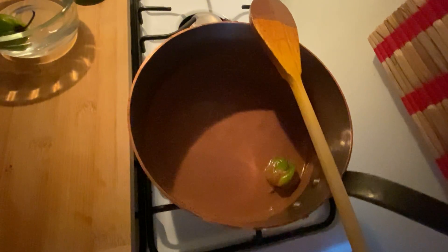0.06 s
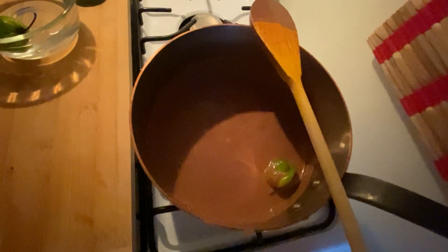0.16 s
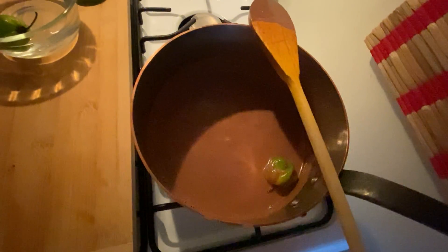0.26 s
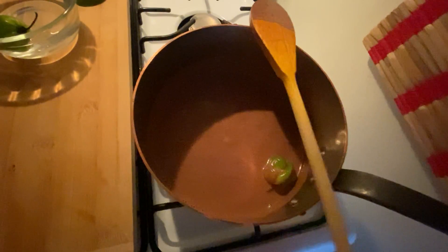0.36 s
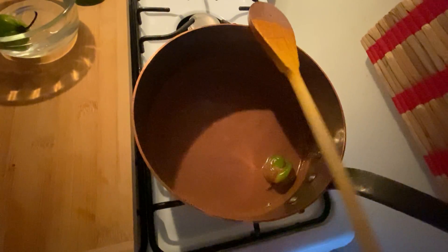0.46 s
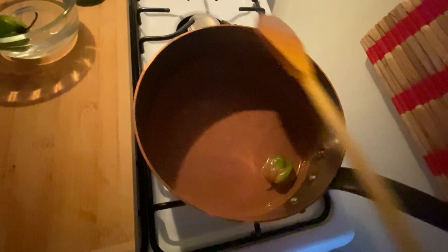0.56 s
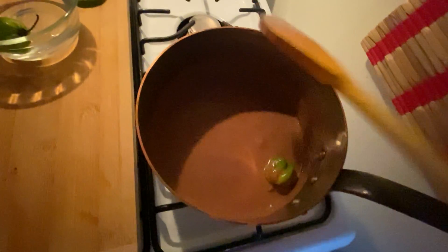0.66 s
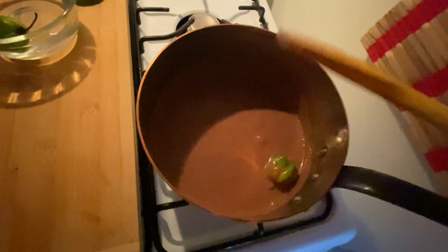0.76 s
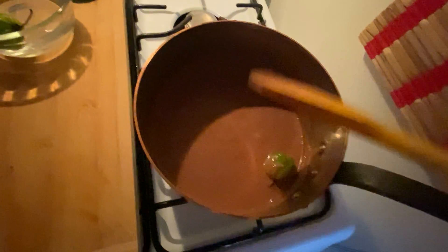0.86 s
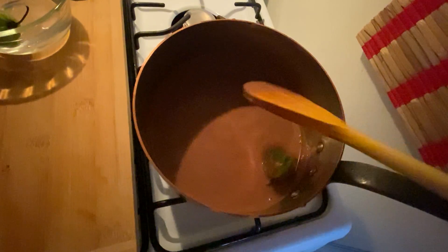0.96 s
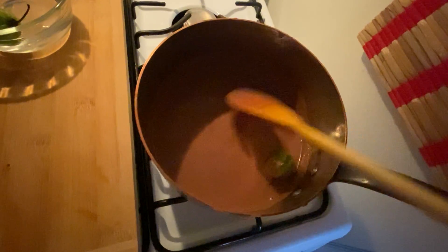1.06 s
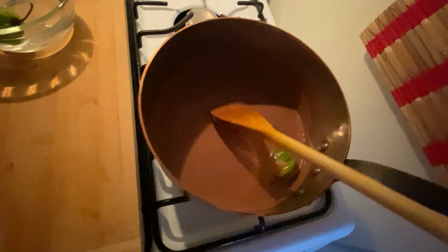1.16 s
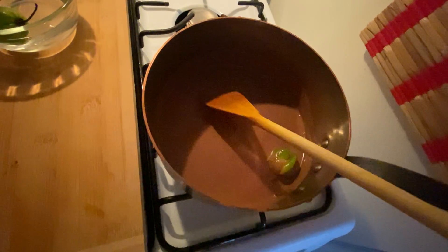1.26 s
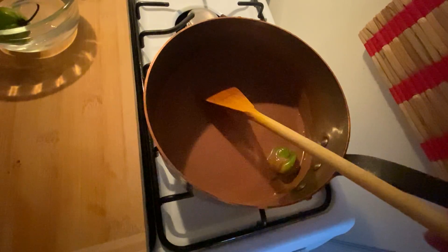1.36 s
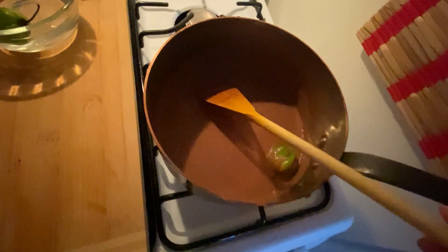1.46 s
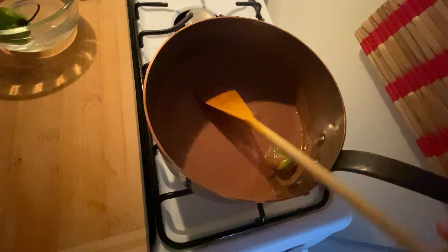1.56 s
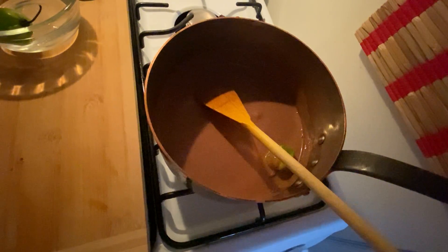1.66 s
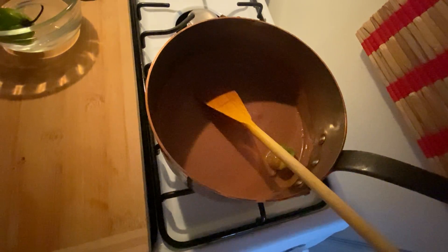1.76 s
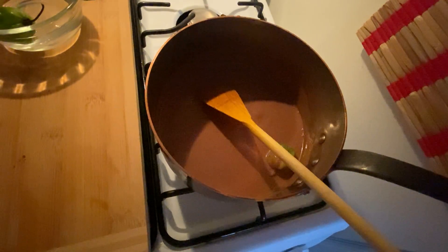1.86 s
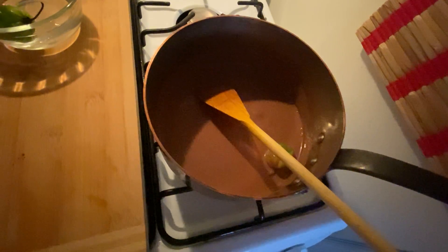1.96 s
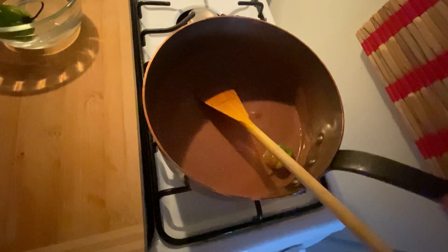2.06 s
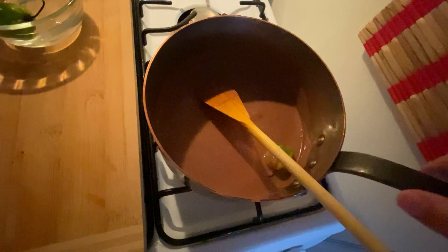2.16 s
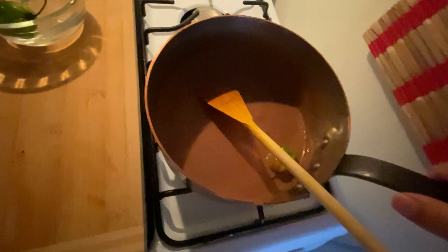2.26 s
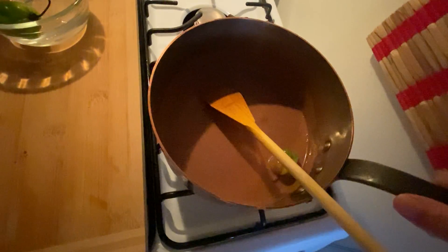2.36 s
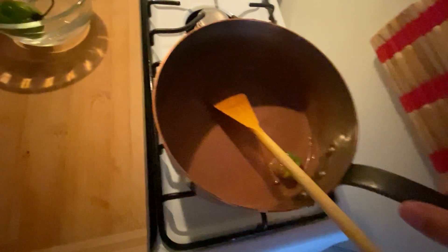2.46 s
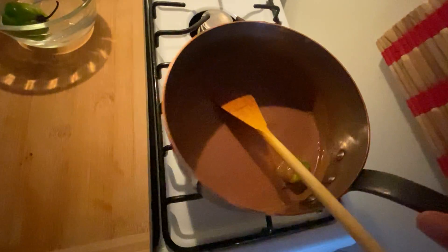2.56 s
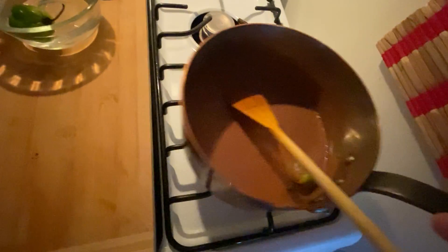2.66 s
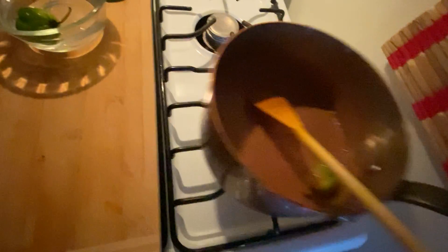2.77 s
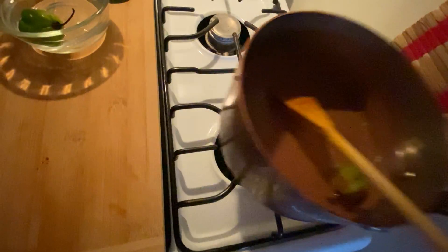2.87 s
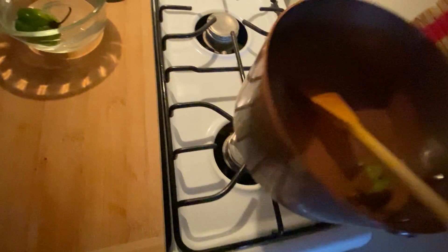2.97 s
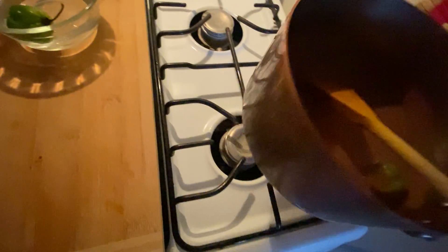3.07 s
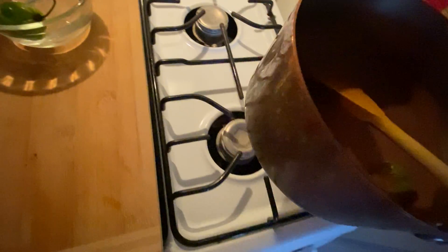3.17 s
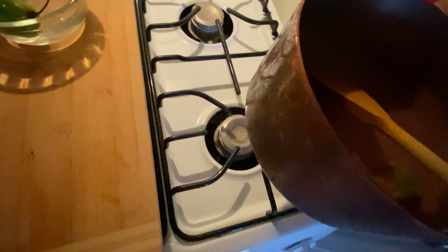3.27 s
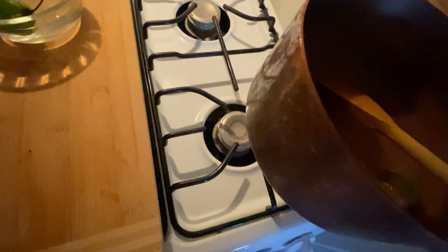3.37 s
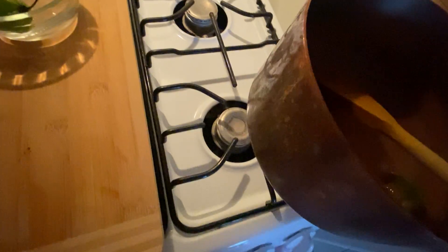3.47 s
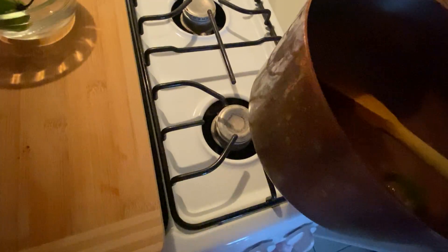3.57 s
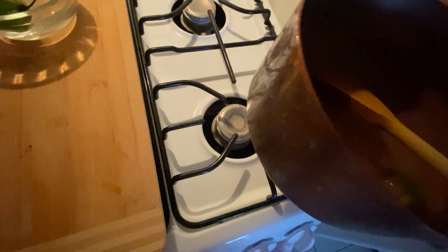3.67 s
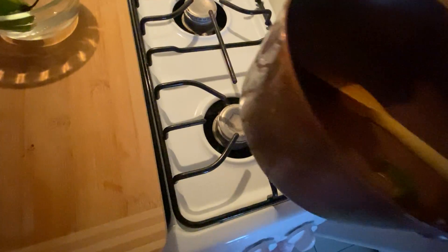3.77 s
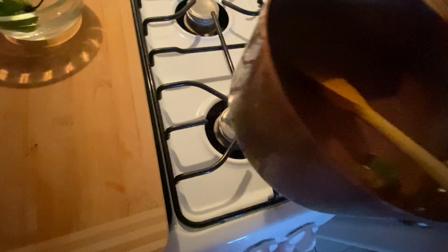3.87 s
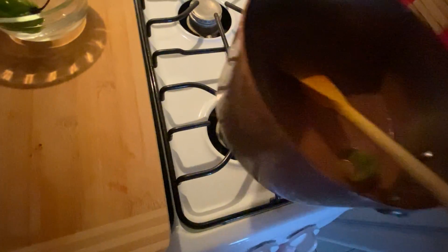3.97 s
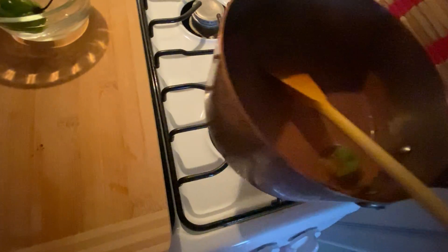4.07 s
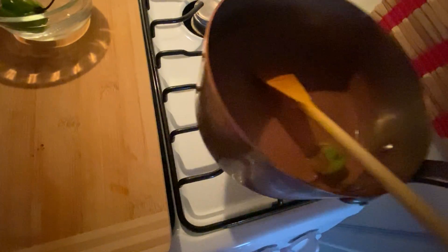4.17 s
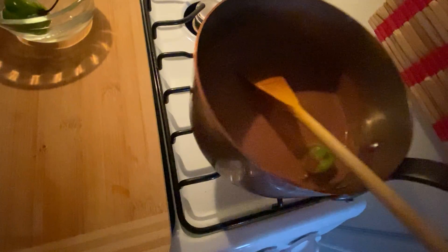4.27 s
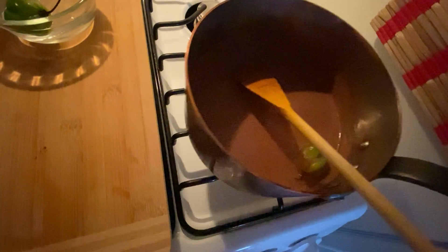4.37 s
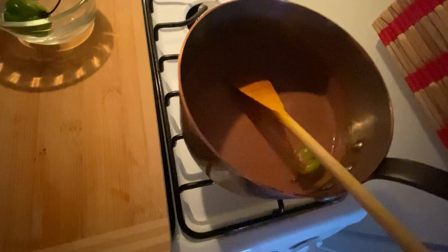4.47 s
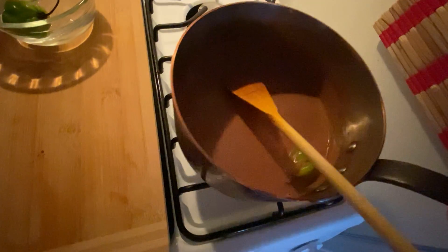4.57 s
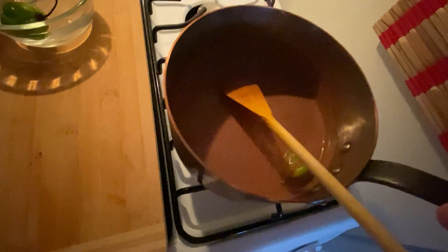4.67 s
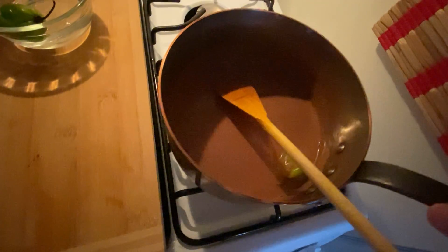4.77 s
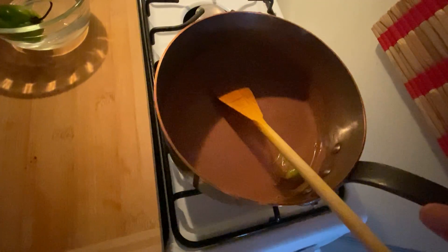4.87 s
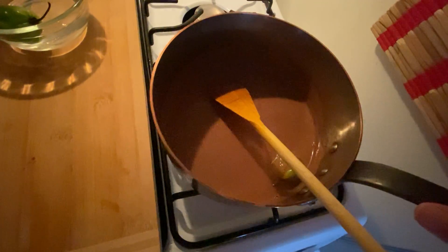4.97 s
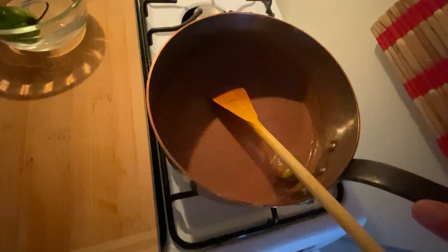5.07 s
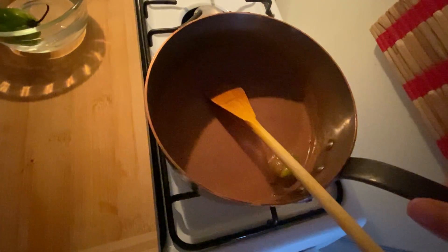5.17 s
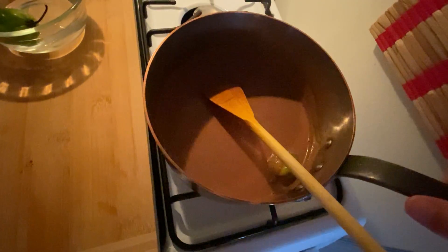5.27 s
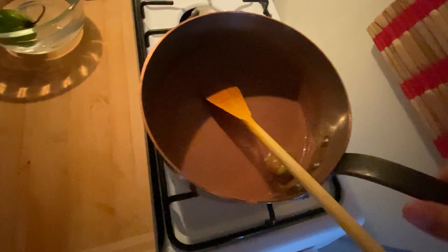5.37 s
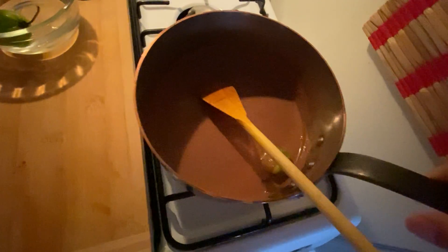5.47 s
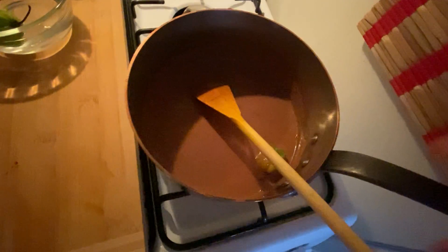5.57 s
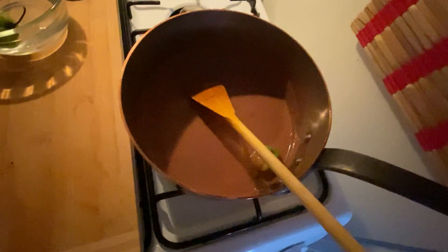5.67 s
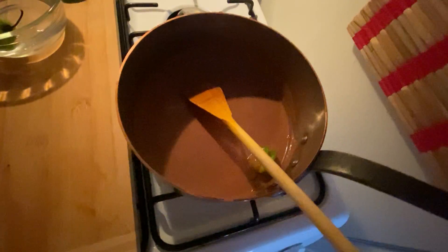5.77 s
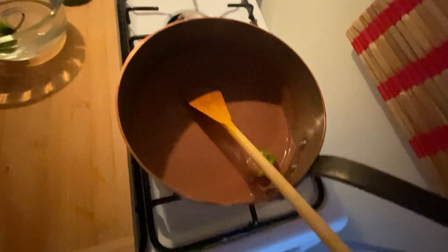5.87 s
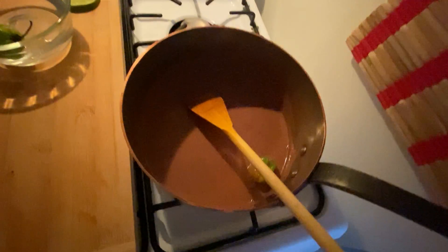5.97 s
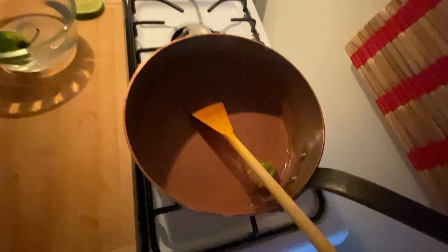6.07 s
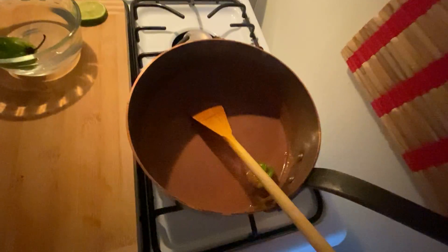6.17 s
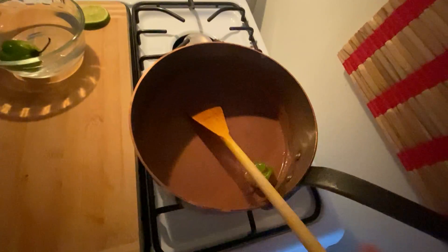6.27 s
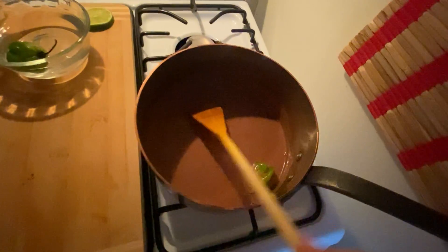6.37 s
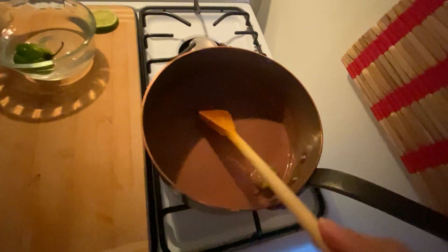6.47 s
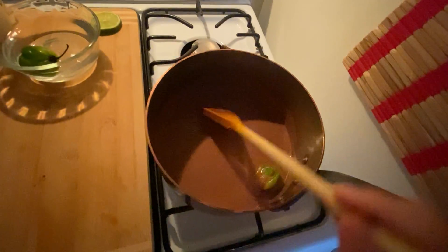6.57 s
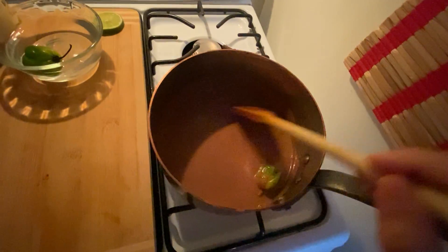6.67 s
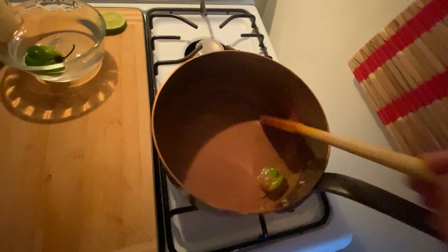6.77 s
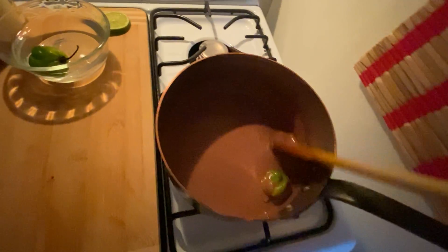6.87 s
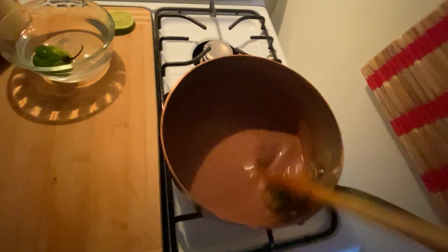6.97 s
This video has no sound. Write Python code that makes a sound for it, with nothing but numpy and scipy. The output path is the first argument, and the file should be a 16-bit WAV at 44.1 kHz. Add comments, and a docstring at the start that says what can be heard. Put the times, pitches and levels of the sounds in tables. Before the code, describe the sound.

Over steady fan hum and faint fridge buzz, a spoon taps a metal pan, the pan lifts with small clanks, then lands in a loud rattle.

```python
"""Copper pan and wooden spoon on a gas hob

Close by in a small, hard-walled kitchen, a wooden spoon is laid into a copper saucepan. The pan is dragged
off the iron grate, tilted and set down with a clatter; then the spoon is picked up and rings the pan's wall.
Blows drive decaying modes and short noise bursts; rubs are shaped noise. A fan hums as shaft tones and air,
and a fridge compressor buzzes as one repeated rattle through a resonant shell, over a faint hiss."""
import sys
import numpy as np
from scipy import signal
from scipy.fft import rfft, irfft, next_fast_len
from scipy.io import wavfile
from scipy.ndimage import uniform_filter1d, map_coordinates

SR = 44100
rng = np.random.default_rng(int(sys.argv[2]) if len(sys.argv) > 2 else 0)


def transcribe(signal):
    """Save signal, clipped to [-1, 1], as a 16-bit WAV file at the path in sys.argv[1]."""
    frames = np.atleast_2d(signal).T
    limited = np.clip(frames, -1, 1)
    pcm = np.round(limited * 32767).astype(np.int16)
    wavfile.write(sys.argv[1], SR, pcm)


N = 309582  # length in samples

# the spoon meets the pan: start_s, level_db, lower_knock_hz, upper_knock_hz, upper_knock_db,
# bottom_ring_db, wood_click_db, handle_ring_db, wall_ring_db
SPOON_TAPS = [(1.024, -68, 1350, 1900, -3, 6, -14, -18, -8),
              (1.198, -31.3, 730, 1250, -10, -4.5, -28, -36, -30),
              (1.511, -66, 1100, 1900, -4, 0, -15, -20, -20), (1.66, -46, 790, 1400, -13, -9, -.5, -21, -9),
              (6.8118, -39.5, 980, 1520, 1, -8.5, -18, -15, -24)]


def amp(db):
    """Decibels to gain."""
    return 10 ** (np.asarray(db) / 20)


def unit(x):
    """Scale to rms 1."""
    return x / np.sqrt(np.mean(x ** 2) + 1e-20)


def unit_onset(x):
    """Scale so that the first 20 ms have rms 1."""
    return x / np.sqrt(np.mean(x[..., :SR // 50] ** 2) + 1e-20)


def along(points, hz):
    """Interpolate (Hz, value) points on a log frequency axis."""
    f, v = np.transpose(points)
    return np.interp(np.log(hz + 1), np.log(f + 1), v)


def wobble(rate):
    """A smooth random curve, rate knots a second."""
    knots = rng.standard_normal(int(N * rate / SR) + 4)
    return map_coordinates(knots, [np.arange(N) * rate / SR])


def filtered(x, response):
    """x shaped by a response of frequency, with padding so that tails do not wrap round."""
    n = x.shape[-1]
    m = next_fast_len(n + SR // 4)
    return irfft(rfft(x, m) * response(np.fft.rfftfreq(m, 1 / SR)), m)[..., :n]


def causal(gain):
    """The minimum-phase response with this gain: nothing sounds before the blow."""
    cepstrum = irfft(np.log(np.maximum(gain, 1e-6)))
    half = len(cepstrum) // 2
    cepstrum[1:half] *= 2
    cepstrum[half + 1:] = 0
    return np.exp(rfft(cepstrum))


def resonances(peaks, f):
    """Response of (Hz, width Hz, dB) resonances, summed with alternating signs."""
    total = 0
    for k, (hz, width, db) in enumerate(peaks):
        total = total + (-1) ** k * amp(db) * 1j * f * width / (hz * hz - f * f + 1j * f * width)
    return total


def add(track, s, sound):
    """Mix a sound in at time s."""
    part = track[:, round(s * SR):][:, :sound.shape[-1]]
    part += sound[..., :part.shape[-1]]


def ring(modes, t, scatter_db, spread=2):
    """Decaying modes; strength and phase (spread in radians) differ at the two microphones."""
    hz, db, t60 = np.transpose(modes)[:, :, None, None]
    size = amp(db + scatter_db * rng.standard_normal((len(modes), 2, 1)))
    phase = rng.uniform(0, 2 * np.pi, hz.shape) + spread * rng.standard_normal(size.shape)
    decaying = size * amp(-60 * t / t60) * np.sin(2 * np.pi * hz * t + phase)
    return unit_onset(decaying.sum(0))


def burst(spectrum, t, t60):
    """Countless short-lived modes: coloured noise that dies away."""
    noise = rng.standard_normal((2, len(t))) * amp(-60 * t / t60)
    return unit_onset(filtered(noise, lambda f: causal(amp(along(spectrum, f)))))


def brighten(x, tilt_db):
    """A harder contact tilts the sound towards the treble."""
    return unit_onset(filtered(x, lambda f: causal(amp(tilt_db * np.log2(1 + f / 1000)))))


def stroke(s, length, attack, release):
    """An envelope that rises up to time s, holds for a length, then dies away."""
    t = np.arange(N) / SR - s
    return np.exp(-(np.minimum(t, 0) / attack) ** 2 - np.maximum(t - length, 0) / release)


def in_kitchen(x, wet_db):
    """The sound plus a diffuse tail from the near walls; its treble dies sooner."""
    # the kitchen's decay: pitch_hz, t60_s
    room_decay = [(150, 0.97), (1000, 0.45), (4000, 0.27), (8000, 0.22), (14000, 0.086)]
    hz, t, z = signal.stft(rng.standard_normal((2, SR // 2)), SR, nperseg=256)
    fading = z * amp(-60 * t / along(room_decay, hz)[:, None])
    tail = signal.istft(fading, SR, nperseg=256)[1]
    tail *= 1 - np.exp(-np.arange(tail.shape[1]) / SR / 0.0012)  # the walls answer a little late
    tail /= np.linalg.norm(tail[0])
    return x + amp(wet_db) * signal.fftconvolve(x, tail, axes=1)[:, :x.shape[1]]


def contacts(count):
    """Each clank and its rebound as the pan rocks back, weaker and duller."""
    # pan meets grate: start_s, level_db, brightness_db_per_octave, spot_hz, spot_boost_db, ringing_mode_hz
    clanks = [(2.363, -56, -7, 1430, -11, 1216), (2.485, -42, -3.5, 900, -8, 3467),
              (2.497, -46.5, -4.5, 4400, -5, 3467), (2.578, -47, -9, 1300, 3, 1216),
              (2.586, -45.5, -11, 900, -1, 1034), (2.615, -40.5, -3.5, 1900, 6, 1930),
              (2.621, -34.5, -7.5, 1300, 10, 1216), (2.627, -42.5, -8, 1800, 12, 1930),
              (2.65, -44.5, -3, 1250, 17, 1216), (2.658, -54, -3, 1500, 11, 1470),
              (2.705, -52, -20, 1480, -4, 1930), (2.847, -54.5, -12, 1290, -9, 1216),
              (2.915, -54.5, -12, 1380, -7, 1216), (4.994, -32, -6, 900, 2, 806),
              (5.003, -27, 0, 1520, -3, 3079), (5.012, -37, -1, 6500, 12, 1930),
              (5.021, -35, -5.5, 1300, -1, 1216), (5.089, -31.5, -3, 2630, -3, 2742),
              (5.102, -39, -3, 1300, 2, 1400), (5.125, -29, -3, 1500, 3, 1034),
              (5.137, -23.5, 3.5, 3800, 0, 4080), (5.146, -24, -2, 1910, 0, 1400),
              (5.171, -34.5, -7, 1120, 8, 806), (5.178, -41, -8, 1700, -2, 1530),
              (5.212, -46, -5.5, 3450, 11, 3467), (5.415, -60, -2, 1500, 13, 1390),
              (5.468, -49, -4.5, 1300, -16, 1216), (5.505, -42, -8, 1090, -6, 1130)]
    delay_s, loss_db, dull_db_per_octave = .029, 18.5, 8
    return [(s + k * delay_s, db - k * loss_db, tilt_db - k * dull_db_per_octave, *spot)
            for s, db, tilt_db, *spot in clanks for k in range(count)]


def pan_on_grate():
    """A blow and a rattle of smaller ones, coloured by the spot struck; modes near a set pitch ring most."""
    # modes of pan and grate together: pitch_hz, level_db
    pan_modes = [(441, -1), (628, -14), (806, -3), (861, -3), (956, -8), (1034, -6), (1152, -10),
                 (1216, -2.5), (1400, -4), (1470, -7), (1530, -5), (1730, -3.5), (1930, -3), (2111, -10),
                 (2201, -11), (2285, -9), (2742, -7), (2884, -4), (3079, -5), (3235, -11), (3467, -7),
                 (3672, -10), (3777, -9), (3910, -11), (4098, -9), (4449, -13), (4661, -11), (4960, -12),
                 (5651, -13), (6054, -13), (6202, -15), (6598, -14)]
    # spectrum of the dense clash: pitch_hz, level_db
    iron_clash = [(150, -15), (400, -10), (800, -1.5), (1500, -3), (2000, -3.5), (2500, -7.5), (4000, -6.5),
                  (6500, -14), (8500, -17), (12000, -30.5), (16000, -41)]
    favour_db, favour_octaves = 6, .05  # modes near the ringing pitch are driven harder: how much, how near
    detune_share, rattle_per_s = .004, 800  # shift of each mode per contact; small blows while it grinds
    grind_s, grind_at_db, grind_doubles_db = 0.008, -25, 20  # lighter contacts grind longer
    out, t = np.zeros((2, N)), np.arange(SR * 2 // 5) / SR
    bite = 1 - np.exp(-t / .001)  # the weight comes on within about a millisecond
    for s, db, tilt_db, spot_hz, spot_db, ring_hz in contacts(count=2):
        modes = []
        for hz, mode_db in pan_modes:
            favour = favour_db * np.exp(-(np.log2(hz / ring_hz) / favour_octaves) ** 2)
            shifted_hz = hz * (1 + detune_share * rng.standard_normal())
            modes.append((shifted_hz, mode_db + favour, .24 * (hz / 1000) ** -.2))  # high modes die sooner
        grind = grind_s * 2 ** ((grind_at_db - db) / grind_doubles_db)
        small_blows = rng.standard_normal(len(t)) * (rng.random(len(t)) < rattle_per_s / SR)
        force = .65 * small_blows * np.exp(-t / max(grind, .001))
        force[0] = 1  # the main blow
        clash = burst(iron_clash, t, t60=0.031)
        clash = unit_onset(signal.fftconvolve(clash, force[None], axes=1)[:, :len(t)])
        blow = bite * (in_kitchen(clash, wet_db=-9) + amp(-3.5) * ring(modes, t, scatter_db=2))
        blow = filtered(blow, lambda f: 3 + resonances([(spot_hz, 0.35 * spot_hz, spot_db)], f))
        add(out, s, amp(db) * brighten(blow, tilt_db))
    return out


def hob_boom():
    """The hob's sheet steel top booms as the pan's weight comes onto it."""
    # the weight comes on: start_s, level_db
    weight_onsets = [(2.52, -60), (2.619, -46.5), (5.008, -47), (5.14, -37), (5.174, -38.5), (5.205, -38)]
    # resonances of the steel top: pitch_hz, width_hz, level_db
    steel_top = [(137.1, 6.3, 24), (265, 39, 8), (442, 13.6, 14)]
    out, t = np.zeros((2, N)), np.arange(SR * 2 // 5) / SR
    for s, db in weight_onsets:
        shake = rng.standard_normal(len(t)) * np.exp(-t / 0.046)
        add(out, s, amp(db) * unit_onset(filtered(shake, lambda f: resonances(steel_top, f))))
    return out


def spoon_taps():
    """Wood on copper: a hollow two-resonance knock, a dry click, and rings of bottom, handle and wall."""
    # spectrum of the dull knock: pitch_hz, level_db
    wood_knock = [(120, 0), (300, 9), (700, 2), (1400, 0), (2050, 3), (2450, -15), (3300, -12), (4200, -18),
                  (6000, -12), (16000, -32)]
    # the blade chatters as it lands: delay_s, level_db
    chatter = [(0, 0), (.0062, -7.5), (.014, -9)]
    # the crack of the wood: pitch_hz, width_hz, level_db
    wood_crack = [(3300, 260, 5), (4100, 550, 0), (5600, 400, -12)]
    # dense, short-lived modes of the pan's bottom: pitch_hz, level_db
    bottom_spectrum = [(120, -3), (300, 5), (450, 6), (850, 6), (1100, 3), (1450, -3), (2100, -9),
                       (2600, -17), (3400, -17), (6000, -30), (16000, -54)]
    # clear modes of the bottom under the spoon: pitch_hz, level_db, t60_s
    bottom_modes = [(427, -2, .16), (491, -2, .16), (684, -2, .2), (860, -4, .16), (910, 0, .14),
                    (1034, -5, .2), (1323, -6, .11), (1535, -6, .13), (2075, -9, .14)]
    # the wooden handle: pitch_hz, level_db, t60_s
    handle_modes = [(3195, 0, .11), (3290, -4, .08), (3368, 0, .11), (3741, -9, .15), (3945, -10, .12)]
    # the copper wall while the spoon leans on it: pitch_hz, level_db, t60_s
    leaned_wall = [(845, -5, .3), (1427, -4, .23), (1965, 0, .22), (2143, -13, .25)]
    lower_width, upper_width = .14, .2  # widths of the knock resonances as shares of their pitch
    rise_s = .0006  # time the wood takes to bear on the pan
    out, t = np.zeros((2, N)), np.arange(SR // 2) / SR
    sides = 1 + .025 * np.array([[1], [-1]])  # each microphone hears its own mix of close modes
    for s, db, lower_hz, upper_hz, upper_db, bottom_db, click_db, handle_db, wall_db in SPOON_TAPS:
        lower = (lower_hz * sides, lower_width * lower_hz, 0)
        upper = (upper_hz * sides, upper_width * upper_hz, upper_db)
        spot = lambda f: resonances([lower], f) + resonances([upper], f)
        impulse = 1.0 * (t == 0)
        knock = filtered(impulse, lambda f: causal(amp(along(wood_knock, f))) * spot(f))
        knock = knock * (1 - np.exp(-(t / rise_s) ** 2))
        landings = [amp(loss_db) * np.roll(knock, round(delay * SR), axis=1) for delay, loss_db in chatter]
        knock = unit_onset(sum(landings))
        crack = rng.standard_normal((2, len(t))) * np.exp(-t / 0.0036)
        click = unit_onset(filtered(crack, lambda f: resonances(wood_crack, f)))
        bottom = burst(bottom_spectrum, t, t60=0.15) + amp(-1.5) * ring(bottom_modes, t, scatter_db=2)
        bottom_peak = (upper_hz, upper_hz / 2, upper_db + 7)
        bottom = unit_onset(filtered(bottom, lambda f: 1 + resonances([bottom_peak], f)))
        handle = amp(handle_db) * ring(handle_modes, t, scatter_db=1, spread=.5)
        wall = amp(wall_db) * ring(leaned_wall, t, scatter_db=1, spread=.5)
        struck = in_kitchen(knock + amp(click_db) * click + amp(bottom_db) * bottom, wet_db=-11)
        add(out, s, amp(db) * (struck + handle + wall))
    return out


def wall_song():
    """After the last tap the spoon is off the wall, so its lowest modes sing on."""
    # the copper wall left free: pitch_hz, level_db, t60_s
    free_wall = [(926, 0.5, 1.1), (1427, 0, 3)]
    out, t = np.zeros((2, N)), np.arange(SR // 2) / SR
    add(out, SPOON_TAPS[-1][0], amp(-52.5) * ring(free_wall, t, scatter_db=0, spread=.5))
    return out


def spoon_slide():
    """The tip sticks and slips over the bottom, at an uneven rate that rises as the spoon gathers speed."""
    start_s, length_s, level_db = 1.355, 0.061, -41.5
    attack_s, release_s = 0.0076, 0.0098  # the tip grips and lets go quickly
    start_hz, gain_hz_per_s = 272, 330
    slip_hz = start_hz + gain_hz_per_s * np.clip(np.arange(N) / SR - start_s, 0, length_s)
    turns = np.cumsum(slip_hz * np.exp(0.05 * wobble(200))) / SR
    slips = np.diff(np.floor(turns), prepend=0)  # one pulse a slip
    slips = slips * amp(4.2 * rng.standard_normal(N))
    # the pan's body: pitch_hz, width_hz, level_db
    body = [(283, 40, 9.0), (920, 130, -11), (1570, 220, -14), (2150, 300, -25)]
    push = amp(level_db) * stroke(start_s, length_s, attack_s, release_s)
    judder = push * unit(filtered(slips, lambda f: resonances(body, f) / (1 + (f / 2400) ** 4)))
    return in_kitchen(np.array([judder, judder]), wet_db=-18.5)


def brushing():
    """Light dry friction of spoon, fingers and sliding pan: a fine, grainy hiss."""
    # dry rubs, each at full level from its start: start_s, length_s, level_db
    dry_rubs = [(0.388, 0.018, -61.5), (0.487, 0.044, -59), (0.589, 0.034, -59), (0.705, .025, -69),
                (1.214, 0.47, -67), (2.498, 0.15, -55), (6.29, 0.29, -71), (6.397, 0.049, -66.5),
                (6.69, 0.36, -70.5)]
    attack_s, release_s = .022, 0.038  # every rub swells and fades alike
    # colour of the friction: pitch_hz, level_db
    colour = [(400, -2), (1500, 9.5), (2500, 2.0), (3400, 9), (7000, 7.5), (9000, 5.0), (11000, 1.0),
              (13500, -7), (15500, -6.5)]
    grains = rng.standard_normal((2, N)) * amp(2.1 * wobble(250))
    power = sum((amp(db) * stroke(s, length, attack_s, release_s)) ** 2 for s, length, db in dry_rubs)
    return np.sqrt(power) * unit(filtered(grains, lambda f: amp(along(colour, f))))


def squeaks():
    """The handle catches on the rim: each short rub sounds one resonance of the handle."""
    # catches on the rim: start_s, level_db, pitch_hz
    rim_catches = [(.578, -63.5, 3320), (.62, -66.5, 3300), (6.305, -66, 4170), (6.401, -65, 3180),
                   (6.415, -60.5, 4230), (6.71, -70, 4170)]
    out, t = np.zeros((2, N)), np.arange(SR // 6) / SR
    for s, db, hz in rim_catches:
        rub = rng.standard_normal((2, len(t))) * t * np.exp(-t / 0.018)
        add(out, s, amp(db) * unit_onset(filtered(rub, lambda f: resonances([(hz, 280, 0)], f))))
    return out


def ticks():
    """Pinpoint sharp ticks, a few milliseconds of high band noise each."""
    # tiny ticks: start_s, level_db, pitch_hz
    tiny_ticks = [(2.59, -60.5, 11500), (2.909, -77, 13000), (2.997, -73, 14000), (3.058, -66, 11100),
                  (3.088, -59, 13700), (5.503, -62, 9300)]
    out, t = np.zeros((2, N)), np.arange(SR // 20) / SR
    for s, db, hz in tiny_ticks:
        snap = rng.standard_normal((2, len(t))) * np.exp(-t / 0.0022)
        add(out, s, amp(db) * unit_onset(filtered(snap, lambda f: resonances([(hz, 3500, 0)], f) ** 2)))
    return out


def shaft_tones(tones, turns, sway_db, sway_rate):
    """Multiples of a shaft's turning, each with its own slow sway in level."""
    total = 0
    for multiple, db in tones:
        level = amp(db + sway_db * wobble(sway_rate)) * np.sqrt(2)  # rms to peak
        total = total + level * np.sin(2 * np.pi * (round(multiple) * turns + rng.random()))
    return total


def fan():
    """Slightly unsteady shaft tones over a low rush of air."""
    # tones: multiple_of_shaft_speed, level_db
    fan_tones = [(3, -49.5), (4, -51), (5, -62), (6, -67.5), (8, -59.5), (11, -71)]
    # air rush: pitch_hz, level_db
    air_rush = [(20, -44), (34, -7.5), (44, -5.5), (57, -4.5), (95, -7.5), (155, 4), (200, -3), (285, 1),
                (340, -5.5), (480, -17.5), (610, -26), (900, -21.5), (1300, -53.5), (2000, -65)]
    # left-right correlation of the rush: pitch_hz, likeness
    likeness = [(60, 1), (200, 0.89), (380, 0.58), (700, 0), (2000, 1)]
    shaft_hz = 45.02
    turns = np.cumsum(shaft_hz * (1 + 0.0011 * wobble(2.997))) / SR
    hum = shaft_tones(fan_tones, turns, sway_db=0.57, sway_rate=1.6)
    angle = lambda f: np.arccos(np.clip(along(likeness, f), -1, 1)) / 2  # shares noise between mid and side
    split = lambda f: amp(along(air_rush, f)) * [np.cos(angle(f)), np.sin(angle(f))]
    mid, side = filtered(rng.standard_normal((2, N)), split)
    return hum + amp(-48.0) * unit(np.array([mid + side, mid - side]))


def drifting(x):
    """Narrow bands swell and sink slowly, as the microphone drifts through standing waves."""
    z = signal.stft(x, nperseg=1024)[2]
    field = uniform_filter1d(rng.standard_normal(z.shape), size=4, axis=1)  # neighbouring pitches
    field = uniform_filter1d(field, size=36, axis=2)  # neighbouring moments
    swaying = z * amp(3 * unit(field))  # 3 dB rms
    return unit(signal.istft(swaying, nperseg=1024)[1][:, :N])


def fridge():
    """Every piston stroke repeats one rattle, with a rush of gas, through the shell; overtones stand out."""
    # the compressor shell: pitch_hz, width_hz, level_db
    shell = [(616, 33, 14), (855, 78, 4), (1273, 18.6, 4.5), (1886, 155, -1.5), (3807, 110, 4.5),
             (4056, 36, 6.5), (4430, 44, 6.5), (4955, 91, 2), (5550, 280, -5), (6487, 81, -0.5),
             (6730, 50, -0.5), (7250, 103, 0.5), (7633, 62, 1.5), (8910, 240, -4.5), (10380, 153, -5)]
    # the clearest tones: multiple_of_shaft_speed, level_db
    fridge_tones = [(10, -78), (15, -77.5), (17, -80), (64, -94), (65, -90), (68, -78), (75, -86),
                    (130, -96)]
    # colour of the room's hiss: pitch_hz, level_db
    hiss_colour = [(500, -10), (1000, 5), (1300, 8), (1650, -1), (2500, -3), (4000, 3), (7000, -5.5),
                   (8500, -4), (10700, -14), (11600, -28), (16000, -55)]
    # level of the room's hiss: time_s, level_db
    hiss_level = [(0, -68), (1.7, -70), (3.3, -68), (4.3, -71), (5.8, -71), (7, -68)]
    # gas over rattle: pitch_hz, level_db
    gas_colour = [(800, 1.0), (4000, -5.5), (6500, 3.5), (10000, -4.0)]
    shaft_hz = 58.8
    size = round(SR / shaft_hz)
    turns = np.cumsum(shaft_hz * (1 + .0001 * wobble(2.59))) / SR
    one_turn = rng.standard_normal((2, size))
    rattle = unit(np.array([map_coordinates(side, [turns % 1 * size], mode="grid-wrap") for side in one_turn]))
    gas = filtered(rng.standard_normal((2, N)), lambda f: amp(along(gas_colour, f)))
    buzz = drifting(filtered(rattle + gas, lambda f: resonances(shell, f) / (1 + (f / 11000) ** 40)))
    tones = shaft_tones(fridge_tones, turns, sway_db=2.6, sway_rate=1.57)
    noise = rng.standard_normal((2, N)) + .5 * rattle
    hiss = unit(filtered(noise, lambda f: amp(along(hiss_colour, f))))
    hiss_db = np.interp(np.arange(N) / SR, *np.transpose(hiss_level))
    # the tilted pan screens the fridge by 1 dB: start, hold, time to move in, time to move out, in s
    shade = amp(-1 * stroke(3.5, 0.69, 0.35, 0.35))
    return shade * (amp(-62.5) * buzz + tones) + amp(hiss_db) * hiss


def swells():
    """Narrow bands of the room's hiss come and go."""
    # swelling bands, each filtered twice: start_s, length_s, pitch_hz, single_filter_width_hz, level_db
    hiss_bands = [(0, 0.33, 1270, 200, -77), (2.8, 1.3, 6400, 350, -78), (3.1, 1.5, 1300, 200, -78.5)]
    swell_s = 0.3  # time to come or go
    out = np.zeros((2, N))
    for s, length, hz, width, db in hiss_bands:
        noise = rng.standard_normal((2, N))
        band = unit(filtered(noise, lambda f: resonances([(hz, width, 0)], f) ** 2))
        out += amp(db) * stroke(s, length, swell_s, swell_s) * band
    return out


def scene():
    """Pan and fan sit at slightly different levels left and right; the fan reaches the right first."""
    # the pan's place: pitch_hz, left_minus_right_db
    pan_place = [(300, 0.5), (800, 0.5), (1400, 3), (3600, 2.5), (5500, 0), (10000, 0)]
    pan = pan_on_grate() + hob_boom() + spoon_taps() + wall_song() + spoon_slide()
    pan = filtered(pan, lambda f: amp(along(pan_place, f) * np.array([[.5], [-.5]])))
    fan_lag_s = 0.00016  # the left microphone hears the fan this much later
    hum = filtered(fan(), lambda f: np.exp(1j * np.pi * f * fan_lag_s * np.array([[-1], [1]])))
    hum = hum * amp([[1], [-1]])  # 2 dB louder on the left
    return pan + brushing() + squeaks() + ticks() + hum + fridge() + swells()


def record(dry):
    """The microphone colours the top octave; nothing is kept from 16 kHz up."""
    # the microphone's uneven top: pitch_hz, level_db
    mic_top = [(8000, -0.5), (9000, -12.5), (10500, 6.5), (12000, 1.5), (13600, -6), (15200, 7)]
    return filtered(dry, lambda f: amp(along(mic_top, f)) * (f < 16000))


dry = scene()
out = record(dry)
transcribe(out)
```